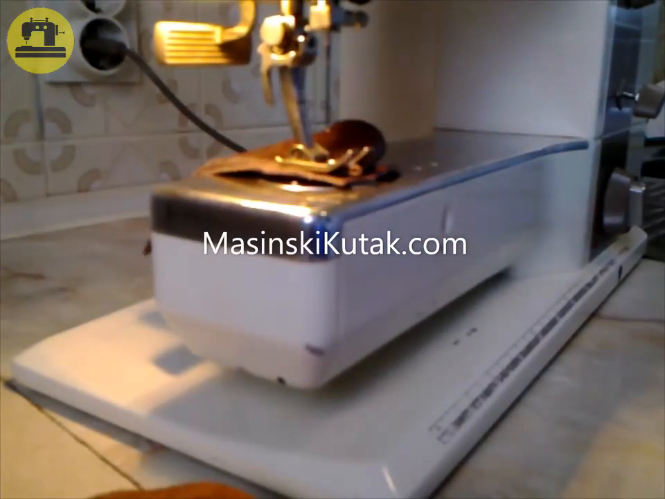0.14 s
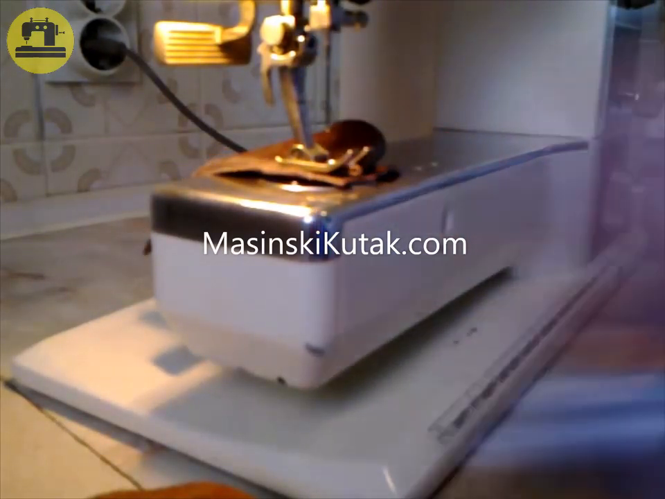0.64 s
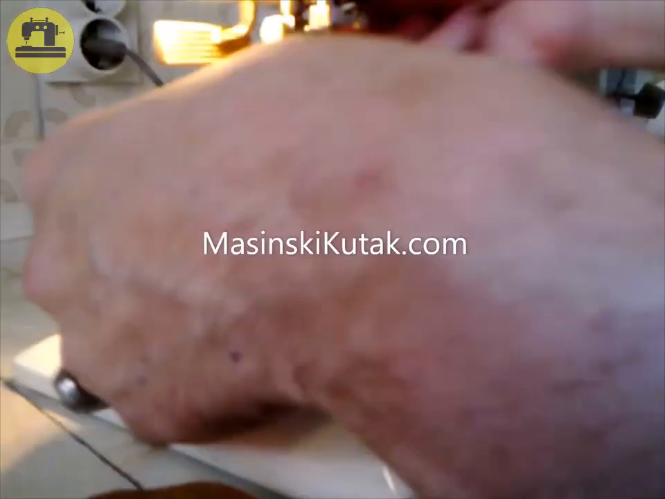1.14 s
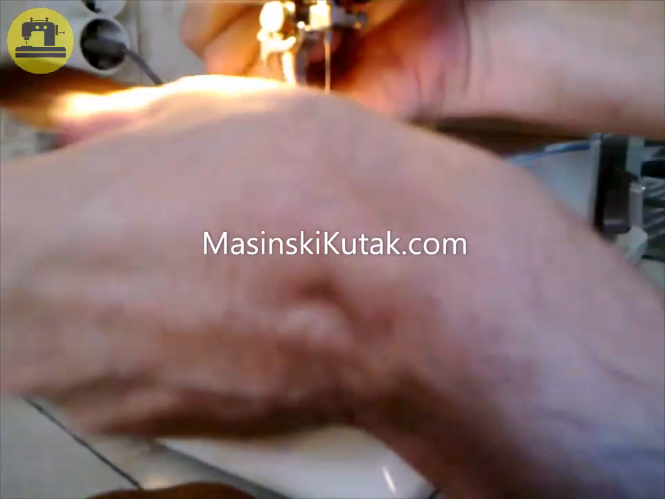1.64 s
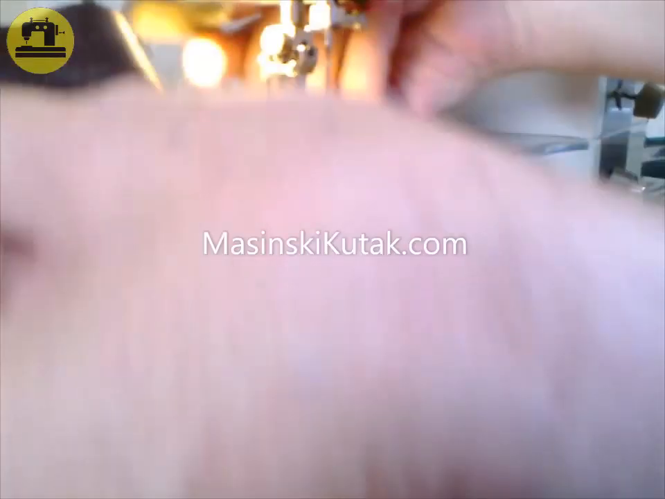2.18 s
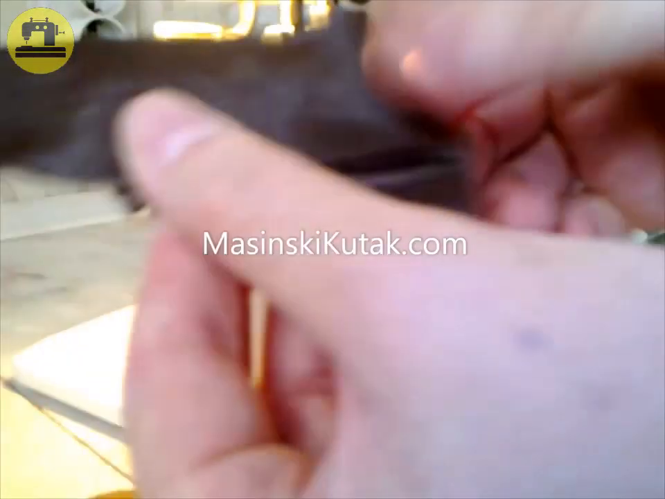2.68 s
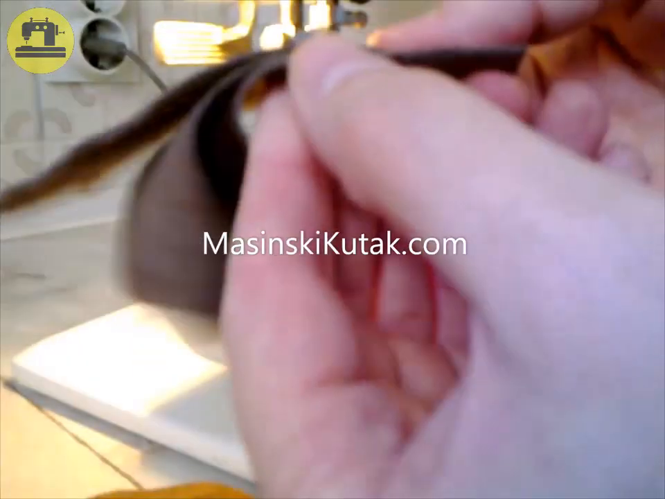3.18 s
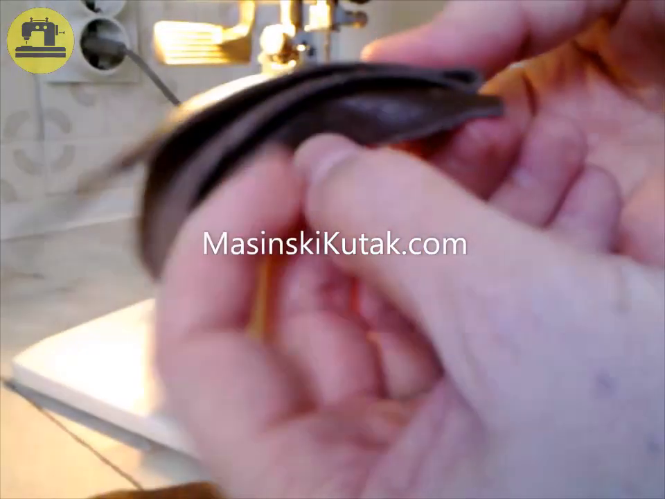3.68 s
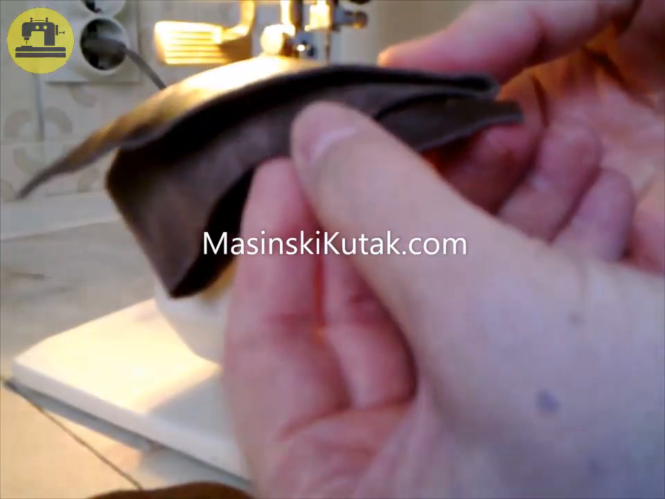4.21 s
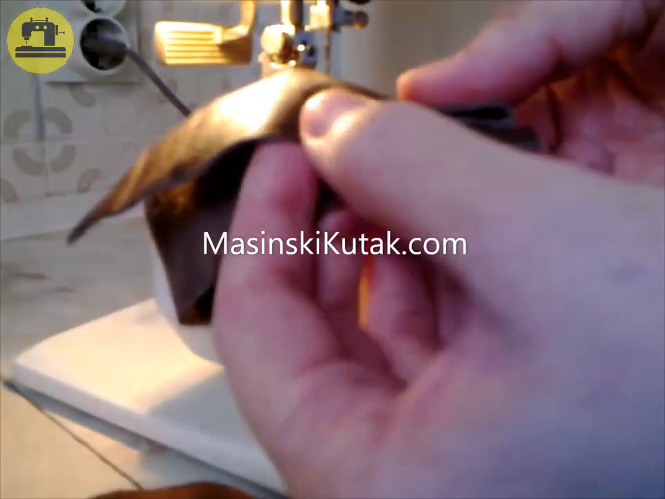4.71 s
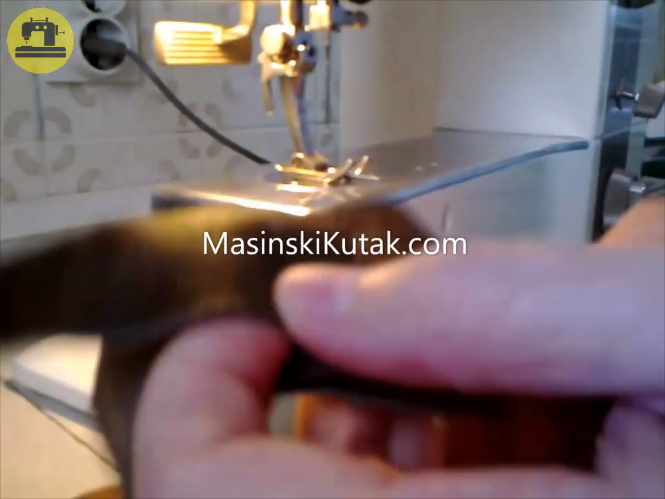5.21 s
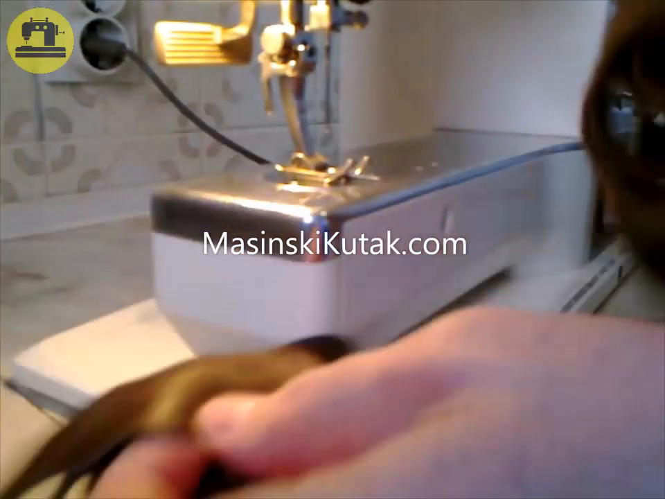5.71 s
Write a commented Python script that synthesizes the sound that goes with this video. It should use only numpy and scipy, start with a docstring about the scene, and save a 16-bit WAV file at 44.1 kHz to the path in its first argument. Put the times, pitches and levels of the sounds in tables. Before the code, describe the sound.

Recorded close in a small, hard room with a short reverberant tail and steady faint low background noise. From 0 to 0.5 s a sewing machine coasts down: a wavering mid-pitched whirr with rough dragging and hiss, overlaid by quick metallic lever knocks. At about 0.6 s comes the loudest clack, hard and hollow, with a table thump and a scrape dying by 0.9 s. Between 1 and 1.9 s there are small light taps and soft rubs over low table rumble, with a clearer knock near 1.45 s. Around 2.05 s a cluster of clacks and a short hissy rub, then at 2.26 s a sharp bright snap with a woody thud. From 2.4 to 5.2 s it is nearly silent, with very faint leather creaks and rustles and a barely audible hum blip near 4 s. At 5.26 s the leather lands with a dull double thump, then slight knocks, rubbing and tiny ticks until 5.8 s.

```python
"""The first thing heard is the fading whirr and rub of a sewing machine coasting to a stop on a table.
Its levers knock; hands pull leather out from under the foot, snap the thread, turn the piece and drop it.
Knocks are damped modes of the struck part, shell and table; rubs are irregular noise driving the shell
and hissing on the surfaces. A small hard room answers with a decaying tail, over steady background noise."""
import sys
import numpy as np
from scipy import signal
from scipy.fft import rfft, irfft, next_fast_len
from scipy.io import wavfile
from scipy.ndimage import map_coordinates

SR = 44100
rng = np.random.default_rng(int(sys.argv[2]) if len(sys.argv) > 2 else 0)


def master(y):
    """Save y as 16-bit WAV."""
    cut = np.clip(np.atleast_2d(y).T, -1, 1)
    pcm = np.round(cut * 32767)  # scale
    wavfile.write(sys.argv[1], SR, pcm.astype(np.int16))


def gain_from_decibels(decibels):
    """Convert decibel values to linear amplitude factors."""
    exponent = np.asarray(decibels, float) / 20
    return 10 ** exponent


N = 257984  # samples


def unit(x):
    """Normalisation: scales the whole array to rms 1."""
    return x / np.sqrt(np.mean(x ** 2) + 1e-20)


def along(points, hz):
    """Interpolation of (Hz, value) points along a logarithmic frequency axis."""
    f, v = np.transpose(points)
    return np.interp(np.log(hz + 1), np.log(f + 1), v)


def curves(rows):
    """Level contours: one value per sample for each column after the time; -120 outside the rows."""
    s, *cols = np.transpose(rows)
    return [np.interp(np.arange(N) / SR, s, c, -120, -120) for c in cols]


def filtered(x, response):
    """Linear filtering: the spectrum of x times a complex response of frequency."""
    n = x.shape[-1]
    m = next_fast_len(n + 8192)
    return irfft(rfft(x, m) * response(np.fft.rfftfreq(m, 1 / SR)), m)[..., :n]


def coloured(x, spectrum):
    """Spectral shaping: x weighted by (Hz, dB) points, then scaled to rms 1."""
    return unit(filtered(x, lambda hz: gain_from_decibels(along(spectrum, hz))))


def band(x, hz, octaves):
    """Band-pass filtering: each row kept around its own centre frequency, all rows jointly at rms 1."""
    return unit(filtered(x, lambda f: np.exp(-(np.log2((f + 1) / hz) / octaves) ** 2) / np.sqrt(hz)))


def gritty(spread_db, rate):
    """Stick-slip friction: noise whose level wanders at random, with rate knots a second."""
    knots = rng.standard_normal(int(N / SR * 2000) + 4)
    level_db = spread_db * map_coordinates(knots, [np.arange(N) * rate / SR])
    return rng.standard_normal(N) * gain_from_decibels(level_db)


def ring(t, hz, db, t60, attack):
    """Damped free vibration: a decaying sine that swells over the contact time."""
    return gain_from_decibels(db - 60 * t / t60) * np.sin(2 * np.pi * hz * t) * (1 - np.exp(-t / attack))


def tent(s, db, rise, fall):
    """Stroke envelope: summed gains that climb to db at s and sink, both straight in dB (20 dB per span)."""
    late = np.arange(N) / SR - s
    return gain_from_decibels(db + 20 * np.minimum(late / np.maximum(rise, .002), -late / np.maximum(fall, .002))).sum(0)


# modes of the machine's shell and arm: f/Hz, relative level/dB, decay time t60/s
SHELL_MODES = [(418, -1.5, 0.077), (557.8, -2, 0.11), (591, -0.5, 0.2), (650, -1, 0.13), (780, -8.5, 0.063),
               (930, -1.5, 0.23), (1058, 0, 0.089), (1200, -0.5, 0.067), (1440, -6, 0.028),
               (1785, -2.5, 0.024), (2360, -2, 0.046), (2600, -13.5, 0.15), (3145, -0.5, 0.069),
               (3380, -13.5, .12), (3566, -7, 0.07), (3860, -10.5, 0.076), (4050, -9.5, .1),
               (4000, -9.5, .1), (4873, -12, 0.044)]
# modes of the table top: f/Hz, relative level/dB, decay time t60/s
TABLE_MODES = [(60, -10, 0.45), (109.2, -2.5, 0.27), (154.7, 6, 0.096), (194, 3, 0.097), (257, 1, 0.05),
               (337.4, -7.5, .1)]
# colour of the crack at contact: f/Hz, relative level/dB
CRACK_SPECTRUM = [(880, -44.5), (1500, -13), (1810, 7.5), (2200, -11), (2480, 1), (3750, -0.5),
                  (4100, -12.5), (6770, -40.5), (8660, -21), (15800, -50.5)]
# knocks of levers and hands: t/s, level/dB, f/Hz of the struck part, its t60/s,
# crack level/dB relative to the knock, before a common trim
KNOCKS = [(.073, -22, 1074, 0.056, -6.5), (.085, -25.5, 607, 0.049, -16), (.154, -20, 726, 0.086, -15.5),
          (.175, -12, 1146, 0.025, -15.5), (.254, -20.5, 558, 0.033, -10), (.319, -29.5, 565, .04, -26.5),
          (.475, -21.5, 1148, 0.06, -20), (.48, -12.5, 604, 0.029, -32), (.49, -24, 300, 0.08, -35),
          (.546, -26.5, 482, 0.042, -10), (.606, -2, 509, 0.035, -20.5), (0.613, -26.5, 1043, 0.046, -32.5),
          (.621, -16.5, 441, .029, -33.5), (.63, -22, 652, 0.037, -31.5), (.676, -32.5, 640, 0.14, -32),
          (.82, -55, 1515, 0.012, -15.5), (.96, -34.5, 417, .021, -9), (1.111, -41.5, 700, 0.028, -22),
          (1.148, -30.5, 1580, 0.014, -31), (1.19, -52, 650, 0.051, 2), (1.241, -36, 930, .022, -41),
          (1.296, -46, 1510, 0.017, -23), (1.321, -37.5, 970, 0.028, -28), (1.39, -46, 1030, .04, -5.5),
          (1.445, -18, 1195, 0.029, -37), (1.456, -24.5, 635, 0.026, -29), (1.615, -36.5, 802, 0.14, -1.5),
          (1.662, -35, 494, 0.036, -2.5), (1.697, -34.5, 1440, 0.051, -20), (1.719, -47, 1440, 0.081, -30),
          (1.797, -42, 330, 0.12, -29), (1.855, -52, 1300, 0.018, -7), (1.876, -37.5, 1290, 0.033, -11),
          (1.997, -33, 780, 0.064, -12.5), (2.015, -22, 1047, 0.041, -4), (2.034, -22, 1252, 0.083, -25.5),
          (2.045, -14.5, 780, 0.059, -29), (2.049, -17, 1150, 0.025, -16.5),
          (2.07, -34.5, 1200, 0.028, -22.5), (2.258, -7, 4067, 0.016, -0.5), (2.263, -8.5, 741, .048, -10),
          (2.289, -18, 476, 0.041, -13.5), (2.312, -18.5, 1093, 0.032, -16.5), (2.643, -52, 622, .053, -22),
          (2.751, -48.5, 1403, 0.011, -15.5), (2.762, -48, 1493, .012, -15), (3.958, -51.5, 605, .04, -10),
          (5.258, -16.5, 804, 0.015, -29.5), (5.265, -17, 520, 0.033, -25.5),
          (5.269, -20, 1080, 0.018, -29), (5.351, -32, 903, 0.031, -28), (5.362, -34, 918, .026, -33),
          (5.411, -26.5, 540, 0.029, -18.5), (5.6, -47.5, 990, .051, -25), (5.614, -36.5, 981, 0.042, -13),
          (5.716, -46.5, 2920, .016, -24), (5.736, -34, 2710, 0.011, -10), (5.768, -39.5, 501, 0.1, -39),
          (5.745, -42, 1000, 0.052, -34), (5.786, -39, 1500, 0.027, -25), (5.79, -34.5, 990, 0.042, -21)]


def knocks():
    """Impact excitation: a blow sounds the struck part, a crack, the nearest shell modes and the table."""
    out, t = np.zeros(N + SR), np.arange(SR // 2) / SR
    shell_hz, shell_db, shell_t60 = np.transpose(SHELL_MODES)[:, :, None]
    table_hz, table_db, table_t60 = np.transpose(TABLE_MODES)[:, :, None]
    scatter_db = 2.5 * rng.standard_normal((len(KNOCKS), len(SHELL_MODES), 1))
    noise = rng.standard_normal((len(KNOCKS), 2, len(t)))
    cracks = coloured(noise[:, 0], CRACK_SPECTRUM)
    crunches = band(noise[:, 1], np.array(KNOCKS)[:, 2:3] * 1.137, octaves=0.76)
    for (s, db, hz, t60, crack_db), luck_db, crack, crunch in zip(KNOCKS, scatter_db, cracks, crunches):
        # a softer contact swells and rings longer
        blow = ring(t, hz, 0, t60, attack=0.027 * t60)
        blow += ring(t, 2.1 * hz, -11.5, 0.8 * t60, attack=0.13 * t60)
        # noise around the struck part's pitch
        blow += crunch * gain_from_decibels(-7.5 - 60 * t / (2.0 * t60)) * (1 - np.exp(-t / 0.0017))
        # modes far from the blow's pitch are barely excited
        reach_db = -7 * np.abs(np.log2(shell_hz / hz))
        mode_db = shell_db + reach_db + luck_db - 17.5
        blow += ring(t, shell_hz, mode_db, shell_t60, attack=0.00029).sum(0)
        blow += ring(t, table_hz, table_db - 30, table_t60, attack=.004).sum(0)
        # the crack decays in two stages, fast then slow
        crack_gain = gain_from_decibels(crack_db - 4 - 60 * t / 0.022) + gain_from_decibels(crack_db - 14.5 - 60 * t / 0.14)
        blow += crack * crack_gain * (1 - np.exp(-t / .0012))
        out[round(s * SR):][:len(t)] += gain_from_decibels(db) * blow
    return out[:N]


# heavy blows on the table top: t/s, level/dB, f/Hz of the struck spot
THUMPS = [(0.074, -35.5, 152), (.482, -38, 202), (0.609, -22, 192), (.62, -24.5, 62), (0.822, -48, 151),
          (1.26, -47, 110), (1.33, -37, 110), (1.453, -35.5, 190), (1.481, -36.5, 110), (1.545, -38, 110),
          (1.664, -47, 150), (1.801, -41, 273), (2.057, -29.5, 125), (2.266, -18.5, 140), (2.289, -28, 70),
          (2.312, -29, 150), (5.259, -20, 220.2), (5.267, -19, 156.7), (5.299, -26, 60), (5.353, -40, 150),
          (5.414, -27.5, 196), (5.46, -45, 150.4)]


def thumps():
    """Modal excitation: a heavy blow rings the table modes, most of all those near the spot's pitch."""
    out, t = np.zeros(N + SR), np.arange(SR // 2) / SR
    table_hz, table_db, table_t60 = np.transpose(TABLE_MODES)[:, :, None]
    for s, db, hz in THUMPS:
        reach_db = -9 * np.abs(np.log2(table_hz / hz))
        modes = ring(t, table_hz, db + table_db + reach_db, table_t60, attack=0.0043)
        out[round(s * SR):][:len(t)] += modes.sum(0)
    return out[:N]


# the drive runs down: t/s, drag through the shell level/dB, singing tone level/dB
COAST = [(0.0, -28, -42), (.045, -40.5, -41), (.1, -36.5, -37), (.27, -36.5, -40.5), (.39, -42.5, -39),
         (.46, -49.5, -56), (.6, -43, -68), (.9, -72.5, -100)]
# strokes of parts, leather and hands: t/s when loudest, rise/s and fall/s (per 20 dB, for the hiss),
# surface hiss level/dB before a common trim, drag through the shell level/dB
RUBS = [(0.073, 0.017, 0.035, -39.5, -39.5), (0.177, 0.072, 0.026, -44, -41.5),
        (0.239, 0.091, 0.037, -35.5, -43), (0.288, 0.072, 0.077, -36, -43),
        (.435, 0.056, 0.083, -35.5, -44.5), (.54, 0.05, 0.14, -44.5, -49.5),
        (0.605, 0.011, 0.027, -36, -39), (0.724, 0.064, 0.074, -36, -41), (.818, 0.0023, 0.033, -47, -47.5),
        (.962, 0.027, 0.068, -41, -51), (1.155, .05, 0.18, -56.5, -56.5), (1.32, 0.021, 0.061, -57, -47.5),
        (1.392, 0.0081, .035, -45, -55), (1.443, 0.0074, 0.11, -48.5, -46.5),
        (1.615, .005, 0.21, -57, -50.5), (1.706, .1, 0.023, -53.5, -54.5),
        (1.879, 0.024, 0.063, -54.5, -59.5), (2.019, 0.033, 0.12, -46, -57.5),
        (2.052, .03, 0.035, -34, -56), (2.258, 0.003, 0.073, -36.5, -59.5),
        (2.332, 0.043, 0.15, -50, -51.5), (2.76, 0.025, 0.036, -57.5, -64.5),
        (5.26, 0.0064, 0.13, -53, -54), (5.46, 0.076, 0.042, -51.5, -46.5), (5.565, .008, 0.35, -63.5, -65),
        (5.737, 0.0065, 0.025, -57, -61), (5.8, .1, .03, -56.5, -68.5)]


def shell_response(f):
    """Forced resonance: a sum of driven shell modes of alternating sign, with falling treble."""
    total = 0
    for k, (centre, db, t60) in enumerate(SHELL_MODES):
        width = 2.2 / t60  # Hz, of the freely ringing mode
        # moving parts widen the modes 3.5 times
        mode = 1j * f * width / (centre ** 2 - f ** 2 + 1j * f * width * 3.5)
        total = total + gain_from_decibels(db) * mode * (-1) ** k
    return total / (1 + (f / 1100) ** 3.4)


def shell_drag():
    """Friction-driven vibration: stick-slip noise of the drive and the strokes excites the shell's modes."""
    s, rise, fall, _, drag_db = np.transpose(RUBS)[:, :, None]
    drag = unit(filtered(gritty(spread_db=3.5, rate=120), shell_response))
    # the shell swells slower than the hiss
    gain = gain_from_decibels(curves(COAST)[0]) + tent(s, drag_db, 1.7 * rise, 1.5 * fall)
    return gain * drag


def whirr():
    """Frequency modulation: a slightly unsteady tone while the shafts still turn."""
    knots = rng.standard_normal(int(N / SR * 100) + 4)
    hz = 588 + 14 * map_coordinates(knots, [np.arange(N) * 25 / SR])
    return np.sqrt(2) * gain_from_decibels(curves(COAST)[1]) * np.sin(2 * np.pi * np.cumsum(hz) / SR)


# colour of rubbing surfaces: f/Hz, relative level/dB
HISS_SPECTRUM = [(710, -38), (1200, -6), (2040, 0), (2390, -6.5), (3270, -5), (4430, -12.5), (4770, -11),
                 (6300, -15), (9210, -19.5), (15800, -30.5)]


def surface_hiss():
    """Friction noise: each stroke hisses where the surfaces rub."""
    s, rise, fall, hiss_db, _ = np.transpose(RUBS)[:, :, None]
    hiss = coloured(gritty(spread_db=3.0, rate=300), HISS_SPECTRUM)
    return tent(s, hiss_db - 3.5, rise, fall) * hiss


# colour of the shaken table: f/Hz, relative level/dB
RUMBLE_SPECTRUM = [(12, -20), (22, 7.5), (31, -13.5), (43, -8.5), (59, 1), (107, -3.5), (136, -5.5),
                   (168, -8.5), (250, -13.5), (390, -31.5), (660, -120)]
# the table shakes under the machine and the hands: t/s, rumble level/dB
SHAKE = [(0.0, -40.5), (.27, -40.5), (.42, -51.5), (.6, -43), (.8, -45.5), (.93, -64), (1.0, -47),
         (1.2, -60.5), (1.27, -46.5), (1.5, -46.5), (1.98, -49.5), (2.06, -37), (2.2, -55.5), (2.3, -42),
         (2.5, -51), (3.0, -78), (5.24, -83), (5.33, -50), (5.47, -44.5), (5.56, -56), (5.8, -56),
         (5.85, -73)]


def table_rumble():
    """Structure-borne vibration: slowly wandering low noise follows the shaking of the table."""
    rumble = coloured(gritty(spread_db=2.0, rate=7.6), RUMBLE_SPECTRUM)
    return gain_from_decibels(curves(SHAKE)[0]) * rumble


# the leather creaks as it is turned over: t/s, level/dB, centre f/Hz, time from peak to 1/e of it/s
RUSTLES = [(2.977, -68.5, 1200, 0.019), (3.24, -70, 892, 0.017), (3.291, -64.5, 1484, 0.032),
           (3.52, -69, 1487, 0.012), (3.689, -68.5, 1907, 0.02), (3.87, -71, 1908, 0.017),
           (4.018, -68.5, 1600, 0.035), (4.331, -63.5, 1998, 0.023), (4.481, -71, 2188, 0.023),
           (4.753, -74, 1489, 0.021), (4.818, -76, 1490, 0.013), (4.899, -77, 1200, .02),
           (4.974, -68, 2485, .035)]


def rustles():
    """Grain noise under a bell envelope: each fold is a soft swell of a few hundredths of a second."""
    out, t = np.zeros(N), np.arange(-SR // 8, SR // 8) / SR
    s, db, hz, length = np.transpose(RUSTLES)[:, :, None]
    grit = gritty(spread_db=2.5, rate=250)[:len(RUSTLES) * len(t)].reshape(len(RUSTLES), -1)
    folds = band(grit, hz, octaves=1.0) * gain_from_decibels(db) * np.exp(-(t / length) ** 2)
    for centre, fold in zip(s[:, 0], folds):
        out[round(centre * SR) - SR // 8:][:len(t)] += fold
    return out


def hum():
    """Pure tone: a faint low hum swells, holds and fades once."""
    start_s, hold_s, level_db = 4.015, .12, -63
    rise_s, fall_s = .03, 0.083  # per 20 dB
    late = np.arange(N) / SR - start_s
    db = level_db + 20 * np.minimum(0, np.minimum(late / rise_s, (hold_s - late) / fall_s))
    return np.sqrt(2) * gain_from_decibels(db) * np.sin(2 * np.pi * 120.3 * late)


# reverberation of the room: f/Hz, decay time t60/s
ROOM_DECAY = [(100, 0.58), (500, 0.41), (2000, 0.25), (5000, 0.26), (12000, 0.081)]


def room(x):
    """Reverberation: after a short gap the walls answer with a noise tail, drawn anew four times a second."""
    out, hop = np.zeros(N + 2 * SR), SR // 4
    for start in range(0, N, hop):
        hz, t, z = signal.stft(rng.standard_normal(SR // 2), SR, nperseg=256)
        decay = gain_from_decibels(-60 * t / along(ROOM_DECAY, hz)[:, None])
        tail = signal.istft(z * decay, SR, nperseg=256)[1]
        wet = signal.fftconvolve(x[start:start + hop], tail / np.linalg.norm(tail))
        out[start + round(.013 * SR):][:len(wet)] += wet
    return out[:N]


# colour of the room and microphone noise: f/Hz, relative level/dB
AIR_SPECTRUM = [(12, -24.5), (20, 3), (116, -2.5), (192, -8), (455, -12), (967, -20.5), (9800, -25.5),
                (14500, -28), (15800, -33.5)]


def air():
    """Stationary background noise of the room and the microphone."""
    return gain_from_decibels(-65.5) * coloured(rng.standard_normal(N), AIR_SPECTRUM)


def scene():
    """Superposition: all sources and the walls' answer add at one microphone."""
    blows = knocks() + thumps()
    rubbing = shell_drag() + surface_hiss()
    echoes = gain_from_decibels(-12.5) * room(blows + .6 * rubbing)
    walls = filtered(echoes, lambda hz: hz ** 2 / (hz ** 2 + 250 ** 2))  # little bass returns
    return (blows + rubbing + whirr() + table_rumble() + rustles() + hum() + walls + air())[None]


def low_pass(x):
    """Removes everything above the highest recorded frequency."""
    return signal.sosfilt(signal.butter(12, 16300, fs=SR, output="sos"), x)


def record(dry):
    """Band limitation: nothing passes at or above 15850 Hz."""
    mix = filtered(dry, lambda hz: hz < 15850)
    return low_pass(mix)


dry = scene()
out = record(dry)
master(out)
```